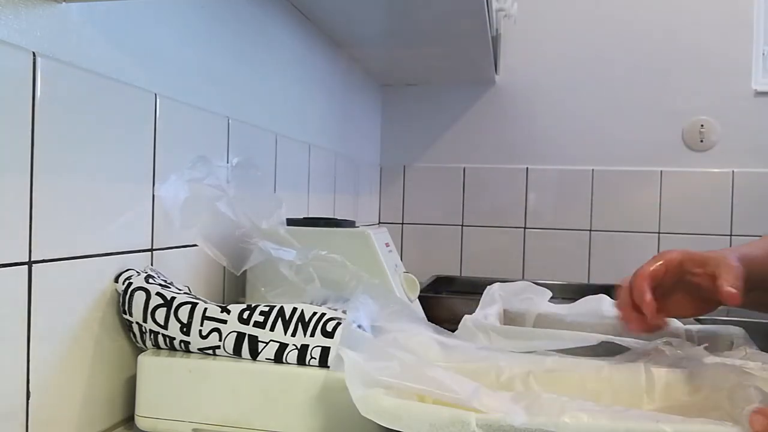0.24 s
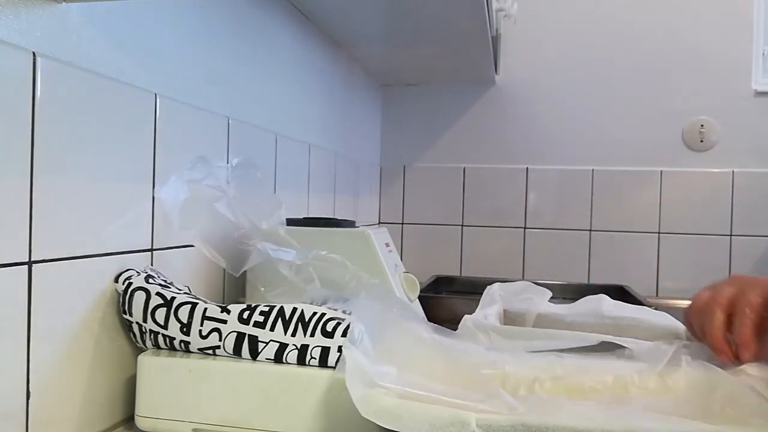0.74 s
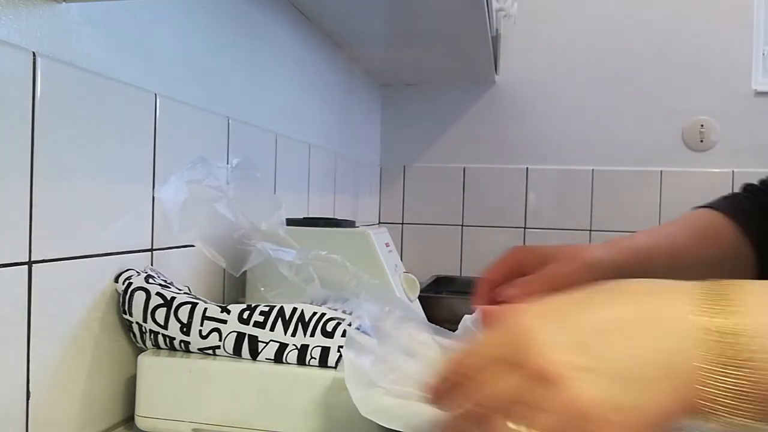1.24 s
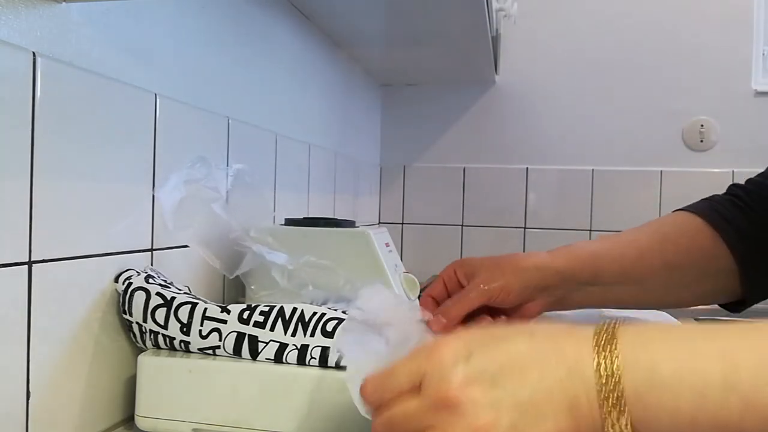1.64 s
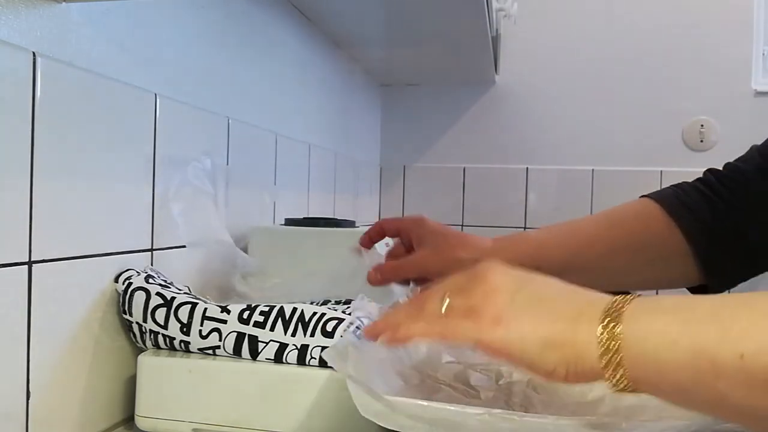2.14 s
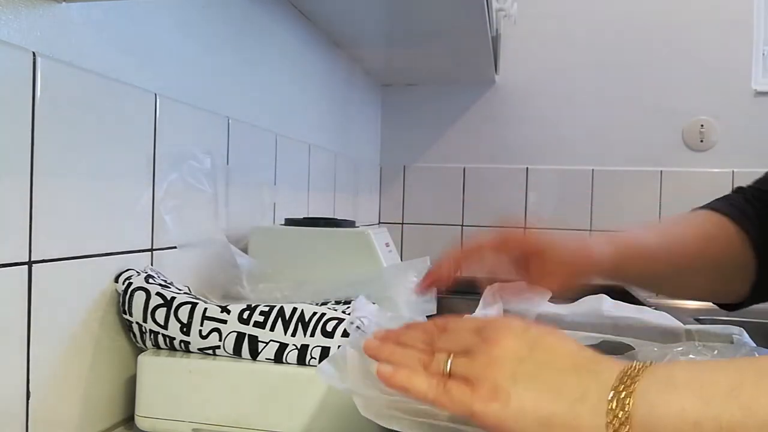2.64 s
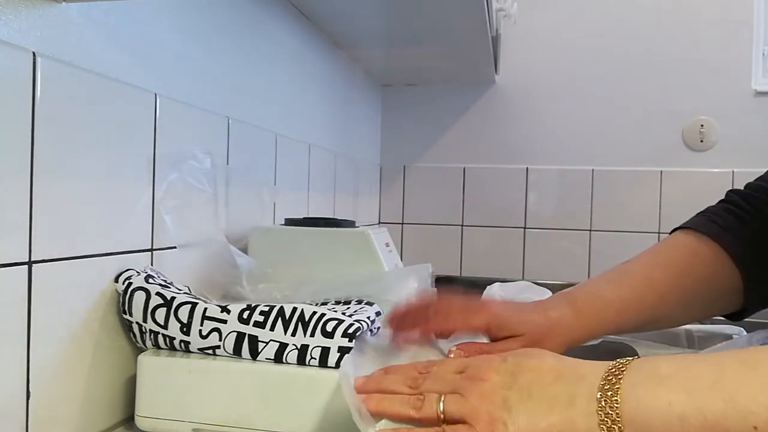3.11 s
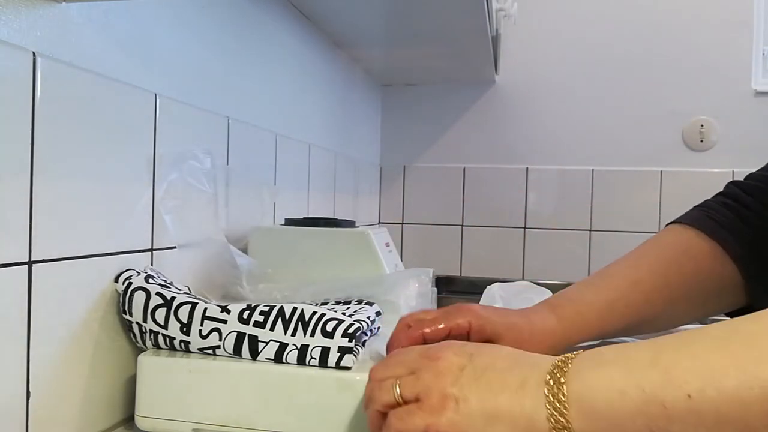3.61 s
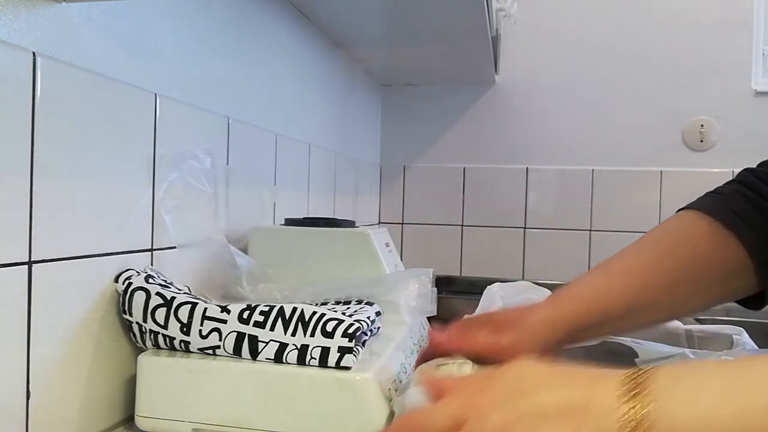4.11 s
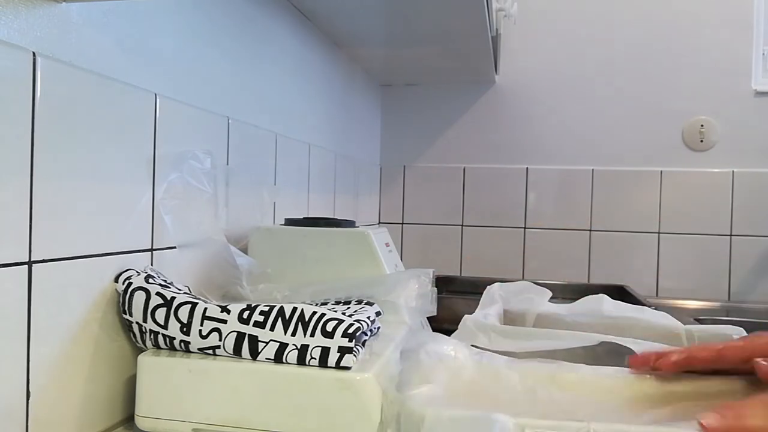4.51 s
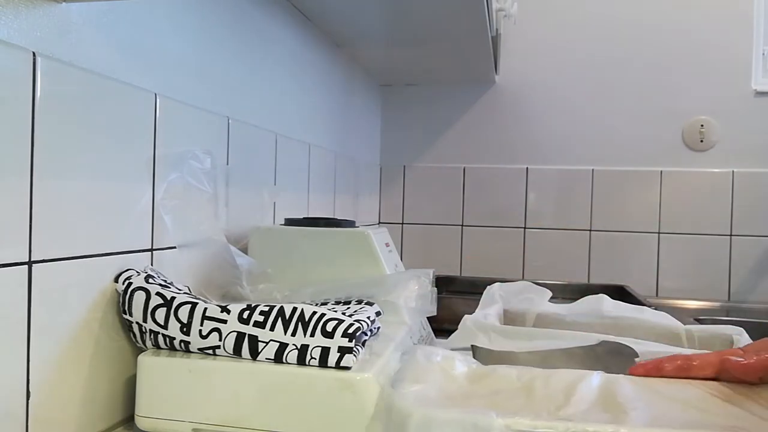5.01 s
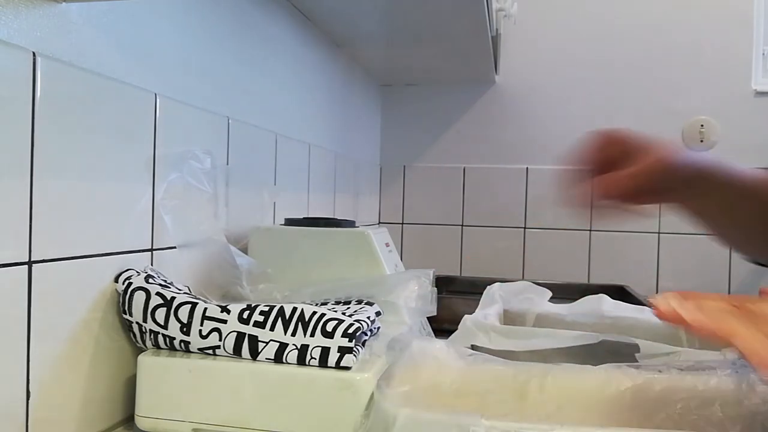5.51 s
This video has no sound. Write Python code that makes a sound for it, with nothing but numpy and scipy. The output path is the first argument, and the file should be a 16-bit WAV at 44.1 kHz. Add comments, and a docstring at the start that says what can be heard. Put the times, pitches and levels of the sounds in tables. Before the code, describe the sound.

Close by in a small tiled kitchen, thin plastic film rustles in short bursts as hands pull it over baking tins. After a brief lull the crackling thickens, folds snapping and wider panels popping as the sheet is pressed down. The rustle then eases, and a tin gives a few light metallic ticks. A low hum wavers very faintly under the quiet room noise.

```python
"""A soft crinkle of thin plastic grows busier as hands fold and tuck a sheet over baking tins.
Creases buckle in swarms of tiny clicks over the friction hiss of sliding film; larger folds snap over
and wide panels pop with a hollow note. Late on, a nudged tin ticks and rings in its modes.
The tiled kitchen corner adds a short bright reverberation, and a low hum wavers underneath."""
import sys
import numpy as np
from scipy import signal
from scipy.fft import rfft, irfft, next_fast_len
from scipy.io import wavfile
from scipy.ndimage import uniform_filter1d

SR = 44100
rng = np.random.default_rng(int(sys.argv[2]) if len(sys.argv) > 2 else 0)


def store_pcm(level_fs):
    """Save levels as 16-bit WAV."""
    pcm = np.round(np.clip(level_fs, -1, 1) * 32767).astype(np.int16)
    wavfile.write(sys.argv[1], SR, np.atleast_2d(pcm).T)


N = 253575
TIME = np.arange(N) / SR


def from_db(db):
    return 10 ** (np.asarray(db) / 20)


def unit_rms(x):
    return x / np.sqrt(np.mean(x ** 2) + 1e-20)


def unit_onset(x):
    """Normalisation to unit RMS over the first 8 ms."""
    return x / np.sqrt(np.mean(x[:, :SR // 125] ** 2))


def add(out, start_s, sound):
    """Superposition: a sound joins the mix at its start time."""
    at = round(start_s * SR)
    out[:, at:at + sound.shape[1]] += sound[:, :N - at]


def per_bin(curve, size):
    """Interpolation of a curve over log frequency onto the bins of a transform."""
    hz, value = np.transpose(curve)
    return np.interp(np.log(np.fft.rfftfreq(size, 1 / SR) + 1), np.log(hz), value)


def colour(x, curve):
    """Minimum-phase filtering by a curve of (Hz, dB) points, through the folded cepstrum."""
    size = 4096
    cepstrum = irfft(np.log(from_db(per_bin(curve, size))))
    cepstrum[1:size // 2] *= 2
    cepstrum[size // 2 + 1:] = 0
    impulse_response = irfft(np.exp(rfft(cepstrum)))
    return signal.fftconvolve(np.atleast_2d(x), impulse_response[None], axes=1)[:, :x.shape[-1]]


def band(x, edges_hz):
    return signal.sosfilt(signal.butter(3, edges_hz, "band", fs=SR, output="sos"), x)


def resonance(x, hz, width_hz):
    """Forced response of one damped mode."""
    r = np.exp(-np.pi * width_hz / SR)
    feedback = [1, -2 * r * np.cos(2 * np.pi * hz / SR), r * r]
    return signal.lfilter(np.array([1, 0, -1]) * (1 - r * r) / 2, feedback, x)


def drift(rate_hz):
    """Low-passed noise: a slow random fluctuation of unit RMS."""
    step, run_in = 40, 2000
    r = np.exp(-2 * np.pi * rate_hz * step / SR)
    noise = rng.standard_normal(N // step + run_in + 2)
    slow = signal.lfilter([1], [1, -2 * r, r * r], noise)[run_in:]
    return np.interp(np.arange(N) / step, np.arange(len(slow)), unit_rms(slow))


def swell_db(start, attack_s, hold_s, fade_db_per_s, rise_db=28):
    """Exponential growth, hold and exponential decay, in dB relative to the top."""
    t = TIME - start - attack_s
    return rise_db * np.minimum(t / max(attack_s, .001), 0) - fade_db_per_s * np.maximum(t - hold_s, 0)


# Coherence of the sound field. Each row: frequency in Hz, left-right correlation from 0 to 1.
COHERENCE = [(30, .995), (130, 0.93), (210, 1), (380, 0.12), (700, 0.34), (1300, 0.32), (2400, 0),
             (4500, 0.34), (16000, 0.0092)]
def stereo_noise(size):
    """Partially coherent noise: the two sides are alike in the bass and mostly unrelated above it."""
    padded = next_fast_len(size + size % 2, True) * 2
    mid, side = rfft(rng.standard_normal((2, padded)))
    alike = np.clip(per_bin(COHERENCE, padded), -1, 1)
    return irfft(np.sqrt((1 + alike) / 2) * mid + np.sqrt((1 - alike) / 2) * side * [[1], [-1]])[:, :size]


# The kitchen's background spectrum. Each row: frequency in Hz, relative spectral density in dB.
ROOM_SPECTRUM = [(20, -13.5), (45, -13.5), (80, -11.5), (105, -10), (135, -3.5), (160, -12.5), (195, -27),
                 (250, -16), (350, -30.5), (1000, -27), (3000, -28), (16000, -57)]
def room_noise(level_db):
    """Stationary noise, dull because most of its power lies in the bass."""
    return from_db(level_db) * unit_rms(colour(stereo_noise(N), ROOM_SPECTRUM))


# Swells of the hum. Each row: start, attack and hold in seconds, level in dB.
HUM_SWELLS = [(.55, 0.16, 0.27, -69.5), (1.002, 0.12, 0.18, -65), (1.35, 0.11, 0.29, -67.5),
              (2.597, 0.13, 0.053, -64), (3.302, .1, 0.045, -63), (4.2, 0.16, 0.045, -68)]
def hum(hz, waver_hz, flicker_db, fade_db_per_s):
    """A low tone comes and goes under slow random modulation of frequency and amplitude."""
    swells = sum(from_db(db + swell_db(start, attack_s, hold_s, fade_db_per_s))
                 for start, attack_s, hold_s, db in HUM_SWELLS)
    phase = 2 * np.pi * np.cumsum(hz + waver_hz * drift(5.16)) / SR
    return np.sqrt(2) * swells * from_db(flicker_db * drift(11)) * np.sin(phase)


def tile_reverb(x, build_s, t60_s, level_db):
    """Reverberation: dense reflections from the tiles build up quickly and decay exponentially."""
    t = TIME[:SR // 2]
    tail = stereo_noise(len(t)) * from_db(-60 * t / t60_s) * (1 - np.exp(-t / build_s))
    tail /= np.sqrt(np.sum(tail ** 2) / 2)
    tail = colour(tail, [(200, 0), (1000, 0.5), (5000, -2.0), (14000, -1.5)])
    return from_db(level_db) * signal.fftconvolve(x, tail, axes=1)[:, :N]


# Modes of the tins and corner. Each row: frequency in Hz, bandwidth in Hz, gain in dB.
CORNER_MODES = [(242, 18, -5.5), (450, 17, -7.5), (657, 33, -0.5), (779, 13, 1.5), (980, 55, -7),
                (1460, 12, -16), (1526, 15, -8), (2040, 12, -23), (2650, 18, -12), (3026, 94, -8.5),
                (3110, 8.8, -1), (3707, 82, -8.5), (5330, 36, -5)]
def corner(x):
    """Sympathetic resonance: the tins and the hollow between the walls ring along with the sound."""
    return x + sum(from_db(db) * resonance(x, hz, width_hz) for hz, width_hz, db in CORNER_MODES)


# Balance of the two sides. Each row: frequency in Hz, left minus right level in dB.
LEFT_LEAN = [(300, 0.5), (700, -0.5), (1150, -0.5), (2800, -3), (4200, 0.5), (5200, 2), (6300, 15),
             (8000, 6), (10500, 6), (13000, 3), (15500, 24)]
def balance(x):
    """Constant-power panning by frequency: the left side receives more of the high treble."""
    hz, lean_db = np.transpose(LEFT_LEAN)
    shares = [2 / (1 + from_db(-sign * lean_db) ** 2) for sign in (1, -1)]
    curves = [np.column_stack([hz, 10 * np.log10(share)]) for share in shares]
    return np.vstack([colour(side, curve) for side, curve in zip(x, curves)])


# Response of the sheet on the worktop. Each row: frequency in Hz, gain in dB.
SHEET_RESPONSE = [(170, -14.5), (245, -8), (320, -12), (450, -7), (560, -7.5), (720, -2), (1100, 2),
                  (1600, -2), (2300, -2.5), (3300, 0.5), (4800, -2), (7000, -10), (11500, -12),
                  (16000, -15)]
def sheet_colour(x):
    """Source and filter: the sheet's response favours the middle frequencies of an excitation."""
    return colour(x, SHEET_RESPONSE)


# Registers of the sheet, from wide panels to the finest creases. Each row: low and high edge in Hz.
REGISTER_EDGES = [(170, 500), (500, 1800), (1800, 6000), (6000, 17000)]
def registers(x):
    """Band-pass division into four registers: flapping, crumpling, crinkle and sizzle."""
    return [band(x, edges_hz) for edges_hz in REGISTER_EDGES]


def click(noise, hz, crack_s, tail_s, tail_db, ring_db, q):
    """Transient excitation: a crack and a slower tail of noise drive one damped resonance."""
    t = TIME[:noise.shape[1]]
    burst = noise * (np.exp(-t / crack_s) + from_db(tail_db) * np.exp(-t / tail_s))
    return unit_rms(burst + from_db(ring_db) * resonance(burst, hz, hz / q))


# Pressure on the tin. Each row: start in seconds, level in dB, decay time in seconds.
PRESSES = [(3.389, -55, 0.068)]
def hand_press(edges_hz):
    """A soft impact: hands press the sheet onto the tin with a dull bump of decaying noise."""
    push = sum(from_db(db) * (TIME > start) * np.exp(-np.abs(TIME - start) / decay_s)
               for start, db, decay_s in PRESSES)
    return push * unit_rms(band(stereo_noise(N), edges_hz))


# Modes of a tin. Each row: frequency in Hz, relative level in dB, time to fall 60 dB in seconds.
TIN_MODES = [(757, -17, 0.14), (1714, -29, 0.18), (2410, -17, 0.17), (2900, -13, 0.09), (3660, -17, .14),
             (4054, -14, .05), (4398, -14, .16), (4700, -10, 0.036), (5292, 5, 0.033), (5491, -11.5, 0.3)]
# Nudges of the tin. Each row: start in seconds, level in dB, centre of the contact noise in Hz.
TIN_NUDGES = [(4.378, -45, 4260), (5.551, -43, 5500), (5.616, -48.5, 4850)]
def tin_ticks(crack_s, scrape_s, scrape_db, modes_db):
    """Free vibration: a bright contact with a brief scrape rings the modes, differently each time."""
    out, t = np.zeros((2, N)), TIME[:SR // 5]
    mode_hz, mode_db, t60_s = np.transpose(TIN_MODES)[:, :, None]
    for start, db, hz in TIN_NUDGES:
        contact = click(stereo_noise(len(t)), hz, crack_s, scrape_s, scrape_db, ring_db=15, q=1.3)
        contact = unit_onset(band(sheet_colour(contact), [600, 17000]))
        strength_db = mode_db + rng.normal(0, 1.7, mode_db.shape) - 60 * t / t60_s
        cycles = mode_hz * t + rng.random((2, len(TIN_MODES), 1))
        ring = np.sum(from_db(strength_db) * np.sin(2 * np.pi * cycles), axis=1)
        add(out, start, from_db(db) * (contact + from_db(modes_db) * ring))
    return out


# Wide panels popping through. Each row: start in seconds, relative level in dB, pitch in Hz.
PANEL_POPS = [(.070, -47, 1070), (.757, -47, 1010), (.785, -37.5, 800), (0.861, -41, 1010),
              (0.897, -42.5, 950), (1.704, -34, 1224), (1.783, -37.5, 1260), (2.925, -35, 870),
              (2.965, -36, 1026), (3.111, -32, 1180), (3.166, -30.5, 1188), (3.392, -31.5, 1230),
              (3.497, -38, 1120), (3.557, -29, 1264), (3.676, -33.5, 1100), (3.97, -36, 1100),
              (4.048, -29, 1125), (5.146, -42, 1060)]
def panel_pops(gain_db, decay_s, rise_s, detune):
    """Damped modal ringing: a panel turns inside out and sounds three close modes for a few cycles."""
    out, t = np.zeros((2, N)), TIME[:SR // 20]
    envelope = (1 - np.exp(-t / rise_s)) * np.exp(-t / decay_s)
    for start, db, hz in PANEL_POPS:
        modes_hz = hz * (1 + detune * np.array([-1, 0, 1]) * rng.uniform(0.38, 1.44, 3))
        phase = rng.uniform(0, 2 * np.pi, (3, 1)) + rng.normal(0, 0.62, (2, 3, 1))
        note = np.sum([[.5], [1], [.5]] * np.sin(2 * np.pi * modes_hz[:, None] * t + phase), axis=1)
        add(out, start, from_db(db + gain_db) * envelope * note)
    return out


# Larger folds snapping over. Each row: start in seconds, relative crinkle level in dB,
# crumpling in dB relative to the crinkle, pitch in Hz, flutter decay time in seconds.
FOLD_SNAPS = [(0.318, -61.5, -10, 3920, 0.0085), (.785, -41.5, -23, 3600, .0037),
              (1.32, -73.5, -4, 5000, 0.01), (1.362, -63, 2, 3000, 0.014), (1.424, -40, -5.5, 6500, 0.0083),
              (1.781, -41.5, -7, 2560, 0.0057), (2.734, -48.5, -8.5, 2900, 0.0083),
              (2.864, -41, -20, 4840, .006), (2.872, -40, -2, 3700, 0.0034),
              (2.976, -42, -10, 3780, 0.0053), (2.988, -34.5, -29, 5040, .0026),
              (3.047, -39.5, -11, 4950, 0.012), (3.113, -40, -8.5, 3020, 0.0035),
              (3.134, -41, -2, 1650, 0.0092), (3.167, -49, -5, 4000, 0.0054),
              (3.226, -43, 1.5, 2630, .0099), (3.39, -40, -5.5, 4610, .013),
              (3.435, -35.5, -11, 5380, .0044), (3.525, -41, -29, 7800, .0069),
              (3.557, -37, -8, 4000, .0045), (3.648, -36.5, -9, 2900, 0.022),
              (3.702, -34.5, -8, 4200, 0.0061), (3.743, -39, -11, 5940, 0.0034),
              (3.761, -35, -16.5, 3240, 0.0081), (3.778, -32, -15, 3170, 0.004),
              (3.819, -39.5, -10, 3470, 0.0059), (3.923, -47.5, -23, 5000, 0.0069),
              (4.045, -39, -4.5, 4230, 0.0082), (4.168, -38.5, -14, 5400, 0.0037),
              (4.267, -55, -5, 2820, 0.0061), (4.471, -41, -6, 3140, 0.0071),
              (4.525, -37, -7.5, 2270, 0.0066), (4.582, -44, -30, 8050, .0066),
              (4.6, -37, -13, 4600, 0.0026), (4.664, -38.5, -14, 4500, 0.013),
              (4.727, -39, -13, 3700, 0.0045), (4.887, -39.5, -34, 3260, 0.008),
              (4.941, -45.5, -33, 4310, .0049), (4.973, -42.5, -24, 3270, 0.0061),
              (4.995, -47.5, -18, 5600, 0.0042), (5.112, -38.5, -20, 6740, 0.0022),
              (5.202, -37.5, -11.5, 6940, 0.014), (5.228, -40.5, -6, 4500, .0098),
              (5.297, -39.5, -9.5, 5000, .005), (5.338, -42, -17, 3270, 0.014)]
def fold_snaps(gain_db, sizzle_db_per_octave):
    """Snap-through: a fold flips with a crack and a flutter; smaller, higher folds sizzle more."""
    out = np.zeros((2, N))
    for start, db, crumple_db, hz, flutter_s in FOLD_SNAPS:
        noise = stereo_noise(SR // 25)
        burst = click(noise, hz, crack_s=0.00031, tail_s=flutter_s, tail_db=13, ring_db=3.5, q=4.3)
        upper_registers = registers(sheet_colour(burst))[1:]
        sizzle_db = -2 + sizzle_db_per_octave * np.log2(hz / 4000)
        for part, relative_db in zip(upper_registers, [crumple_db, 0, sizzle_db]):
            add(out, start, from_db(gain_db + db + relative_db) * unit_onset(part))
    return out


# Pushes, folds and tucks of the hands. Each row: start, attack and hold in seconds, relative crinkle
# level in dB, then flapping, crumpling and sizzle in dB relative to the crinkle.
HAND_STROKES = [(0.0, 0.00067, 0.0087, -53, -21, -6, -5), (0.03, 0.028, 0.031, -60.5, -20, -4, -5),
                (0.19, .04, 0.027, -67.5, -19, -3.5, -2.5), (0.312, 0.1, 0.16, -52, -20, -9, -2),
                (0.579, 0.038, 0.062, -46, -24, -8, -2.5), (0.682, 0.066, 0.033, -44, -20, -6, 0),
                (0.791, 0.019, 0.08, -51, -20, -5.5, -3), (1.355, 0.057, 0.094, -46.5, -16.5, -5.5, -4),
                (1.492, 0.046, .06, -48, -20, -7.5, -3), (1.626, 0.067, 0.18, -51, -21, -4, -3.5),
                (1.849, 0.064, 0.24, -50, -17.5, -9, -4), (2.148, 0.055, .025, -45, -19.5, -9, -3.5),
                (2.273, 0.031, 0.076, -58.5, -18.5, -6.5, -4), (2.436, 0.025, 0.086, -71, -12, -5, -3),
                (2.723, 0.021, 0.091, -46.5, -21.5, -6, -4), (2.852, 0.019, 0.062, -40, -20, -7, -3.5),
                (2.952, 0.024, 0.045, -42, -33, -7.5, -7), (3.042, .04, 0.065, -43.5, -27, -5, -2),
                (3.202, 0.014, 0.013, -48, -17, -2.5, -12), (3.304, 0.039, 0.045, -46, -23, -5, -5),
                (3.374, 0.017, 0.046, -34, -20, -5.5, -4), (3.436, 0.087, .1, -37.5, -25, -7.5, -3.5),
                (3.642, 0.062, 0.11, -36, -23.5, -9, -6.5), (3.838, 0.045, 0.22, -45.5, -25, -4.5, -3),
                (4.001, 0.034, 0.035, -41, -33.5, -7.5, -6), (4.119, 0.015, 0.064, -47.5, -23.5, -4, -10.5),
                (4.391, 0.072, 0.12, -43, -21.5, -8, -3), (4.563, 0.032, 0.14, -42, -30.5, -11.5, -4.5),
                (4.767, 0.036, 0.11, -52, -32, -14, -6.5), (4.87, 0.055, 0.097, -48, -29, -7.5, -6.5),
                (5.079, 0.033, 0.12, -40.5, -26, -8.5, -5.5), (5.264, 0.021, 0.047, -52.5, -13.5, -7, -4.5),
                (5.699, 0.027, .03, -44, -14, -11, -0.5)]
def hand_effort(settle_db_per_s, rest_db):
    """Incoherent addition: strokes sum in power over a faint resting stir, giving dB per register."""
    power = np.full((len(REGISTER_EDGES), N), from_db(rest_db) ** 2)
    for start, attack_s, hold_s, db, flap_db, crumple_db, sizzle_db in HAND_STROKES:
        stroke = from_db(db + np.maximum(swell_db(start, attack_s, hold_s, settle_db_per_s), -100))
        power += from_db([[flap_db], [crumple_db], [0], [sizzle_db]]) ** 2 * stroke ** 2
    return 10 * np.log10(power)


def creases(effort_db, per_s, crowding, spread_db, facets):
    """Buckling: creases give way at random, more often under a firm hand, each at its facet's pitch."""
    rate = per_s * from_db(crowding * effort_db + 3 * drift(14))
    sizes_db = spread_db * np.minimum(rng.exponential(1, N), 2.8)   # most are tiny, a few are loud
    amplitudes = from_db(sizes_db) * rng.choice([-1, 1], N)
    noises = np.split(stereo_noise(facets * (SR // 50)), facets, axis=1)
    facet_at = rng.integers(0, facets, N)
    clicks = [click(noise, hz, crack_s=0.00012, tail_s=0.0055, tail_db=5.5, ring_db=15, q=8.2)
              for noise, hz in zip(noises, np.geomspace(750, 11000, facets))]
    out = np.zeros((2, N))
    for at in np.flatnonzero(rng.random(N) < rate / SR):
        add(out, at / SR, amplitudes[at] * clicks[facet_at[at]])
    return unit_rms(out)


# Sliding of the film. Each row: time in seconds, hiss level in dB relative to the creases.
SLIDE_HISS = [(0, 3.5), (2.3, -0.5), (2.9, -3.5), (4.6, -4), (5.2, -10), (5.75, -3.5)]
def rustle(gain_db):
    """Buckling and sliding friction radiate the work of the hands, which sets each register's level."""
    effort_db = hand_effort(settle_db_per_s=198, rest_db=-85)
    _, _, crinkle_db, _ = effort_db
    crackle = creases(crinkle_db - crinkle_db.max(), per_s=750, crowding=0.15, spread_db=3.5, facets=160)
    slide_db = np.interp(TIME, *np.transpose(SLIDE_HISS))
    film = sheet_colour(crackle + from_db(slide_db) * stereo_noise(N))
    out = 0
    for part, db in zip(registers(film), effort_db):
        # power over 40 ms follows the hands, whichever creases give it off
        running_rms = np.sqrt(uniform_filter1d(np.mean(part ** 2, axis=0), size=SR // 25) + 1e-12)
        out = out + part / running_rms * from_db(gain_db + db)
    return out


def scene():
    """Superposition: sheet and tins sound through the corner and the room, over hum and room noise."""
    sheet = rustle(gain_db=-1.02)
    sheet += fold_snaps(gain_db=0.3, sizzle_db_per_octave=6.5)
    sheet += panel_pops(gain_db=-2.5, decay_s=0.0051, rise_s=0.00066, detune=0.13)
    tins = tin_ticks(crack_s=0.0017, scrape_s=0.013, scrape_db=9, modes_db=-2)
    tins += hand_press(edges_hz=[35, 302])
    near = corner(sheet + tins)
    reflections = tile_reverb(near, build_s=0.0038, t60_s=0.22, level_db=-5.5)
    low_hum = hum(hz=109, waver_hz=2.57, flicker_db=3.0, fade_db_per_s=150)
    return balance(near + reflections) + low_hum + room_noise(level_db=-71.5)


def record(dry):
    """An elliptic low-pass filter cuts the treble steeply above 16.1 kHz."""
    return signal.sosfilt(signal.ellip(12, .2, 80, 16100, fs=SR, output="sos"), dry)


dry = scene()
out = record(dry)
store_pcm(out)
```